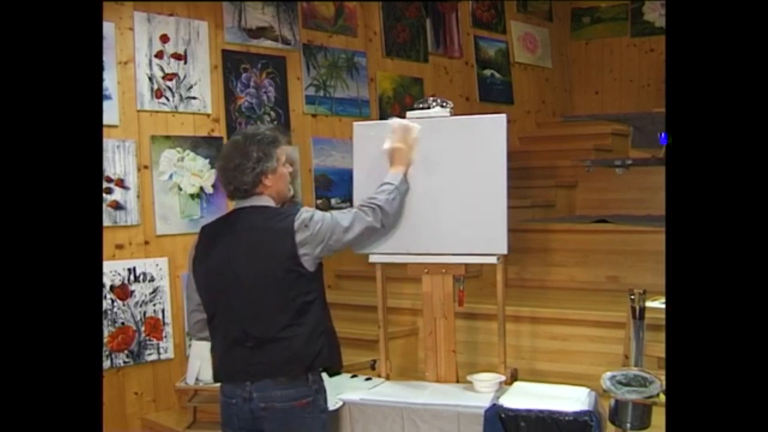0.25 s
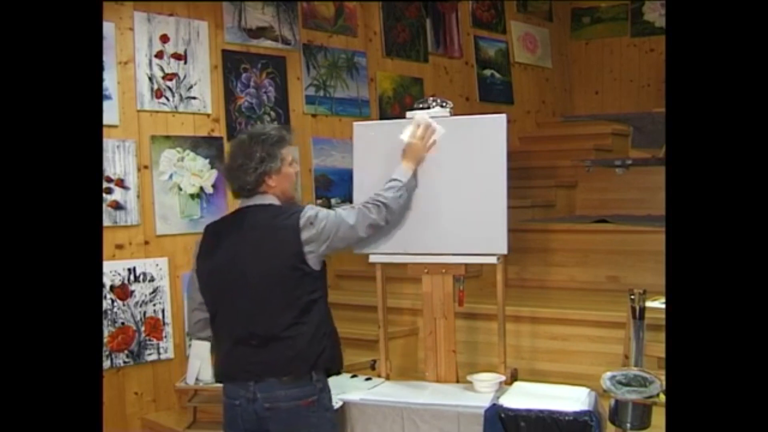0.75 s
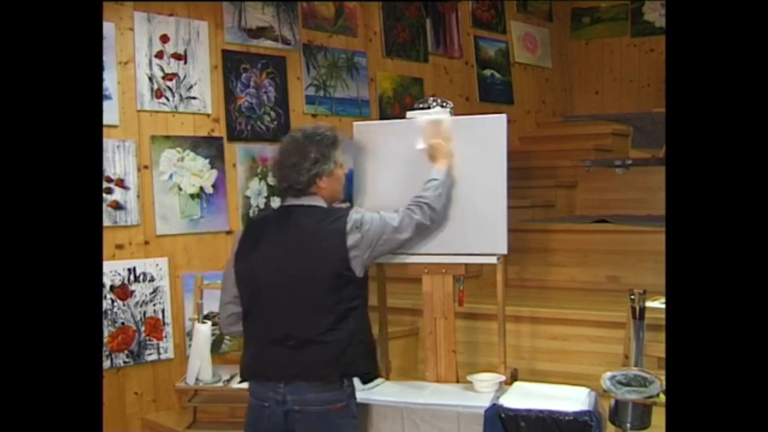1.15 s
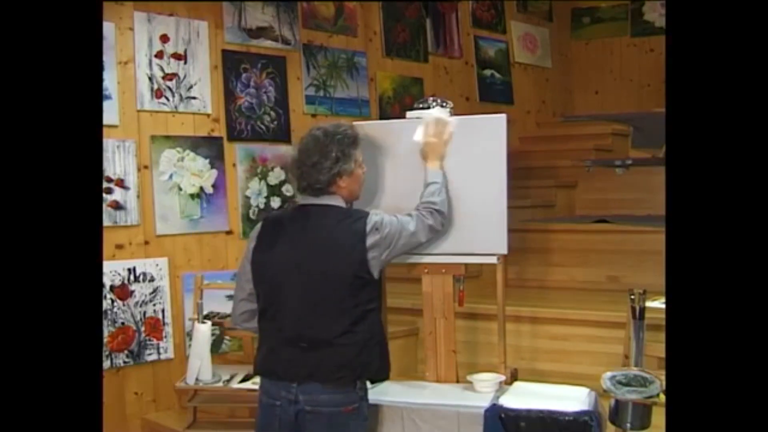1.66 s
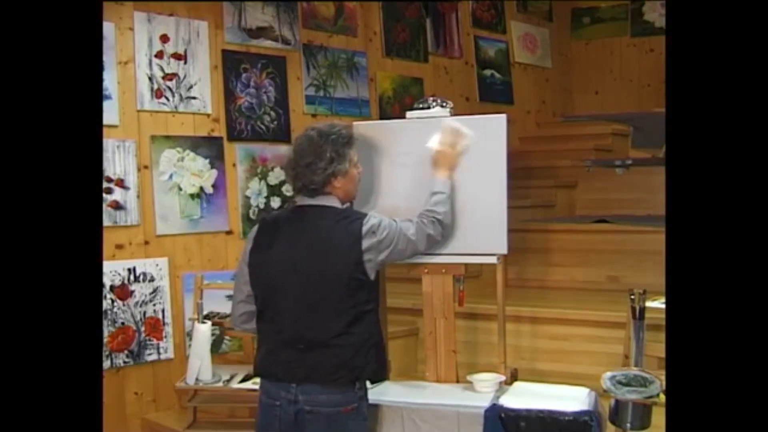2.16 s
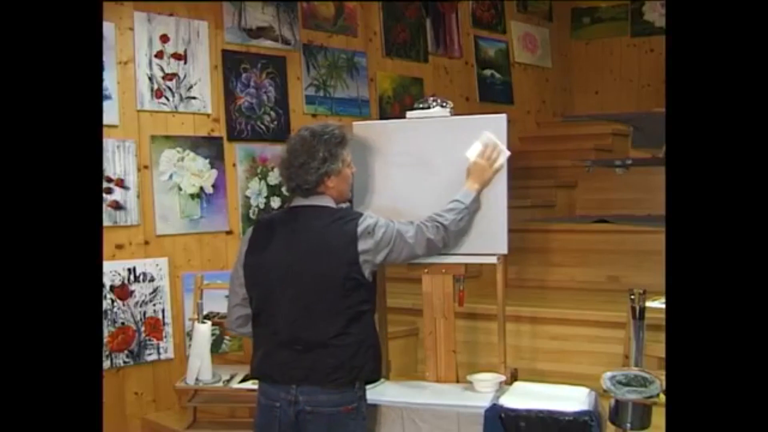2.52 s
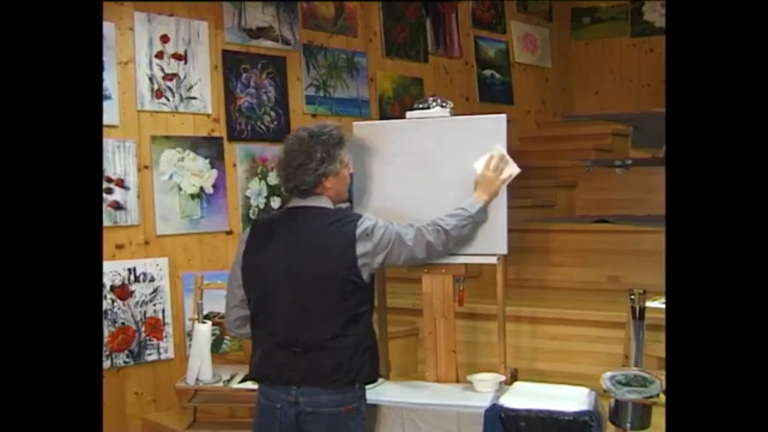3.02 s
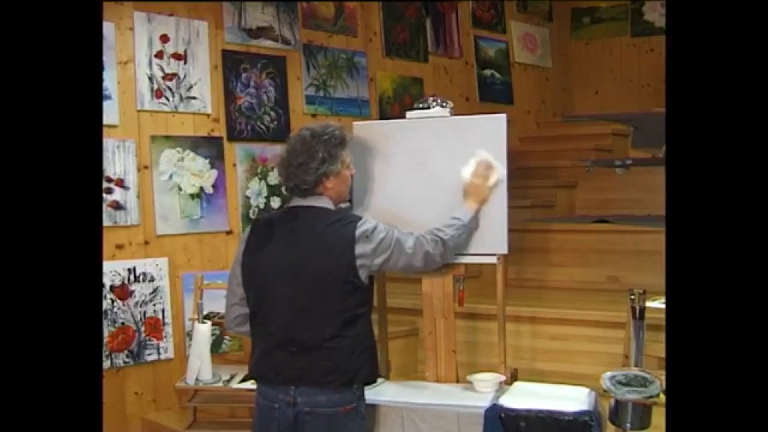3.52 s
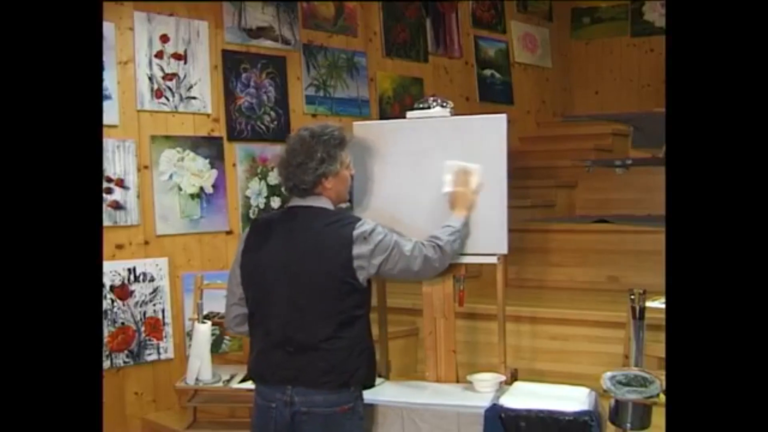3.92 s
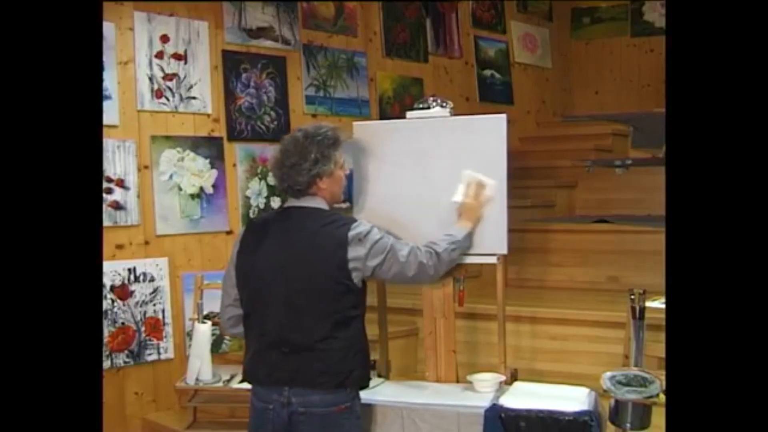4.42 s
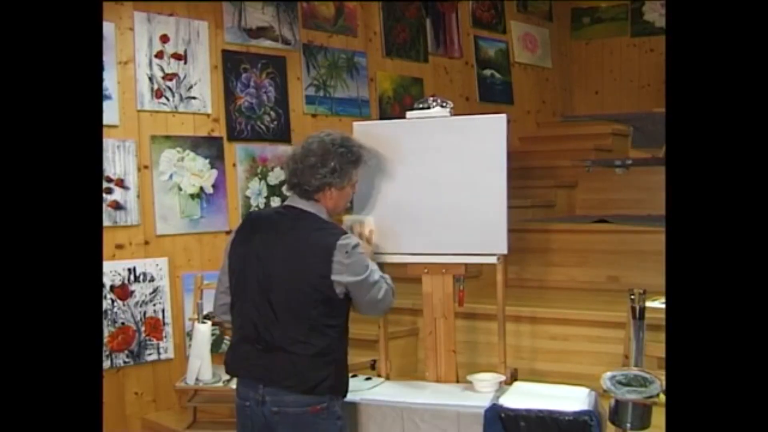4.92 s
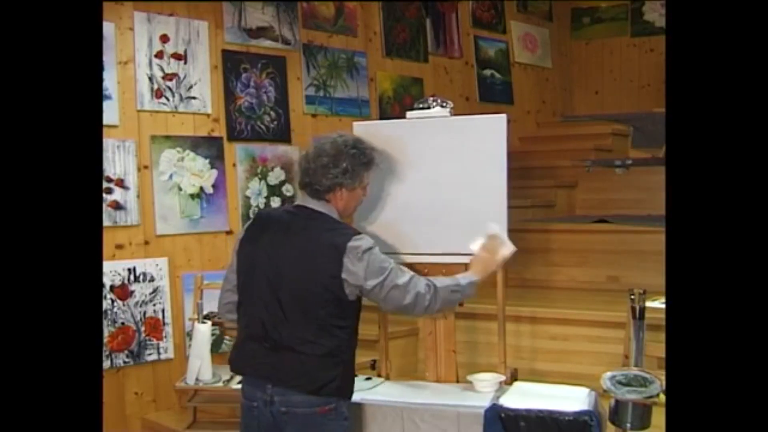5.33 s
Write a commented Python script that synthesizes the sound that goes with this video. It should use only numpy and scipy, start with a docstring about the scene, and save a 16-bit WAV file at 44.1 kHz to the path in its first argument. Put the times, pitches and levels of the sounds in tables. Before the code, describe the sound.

Rhythmic dry swishing of a paper pad wiping taut cloth, about four strokes a second, with faint motor hum underneath.

```python
"""In a quiet wooden studio, a pad of folded paper is wiped to and fro over a stretched canvas.
Paper fibres catch on the threads: a dense patter of random clicks, coloured by pad, cloth and weave.
Soft knocks ring the wooden stretcher as decaying sines, and a noise tail gives the room's reverberation.
Mains hum and a small motor (steady lines over a rumble) and room air (coloured noise) lie underneath.
Both channels carry the same signal."""
import sys
import numpy as np
from scipy import signal
from scipy.io import wavfile

SR = 44100
rng = np.random.default_rng(int(sys.argv[2]) if len(sys.argv) > 2 else 0)


def put_to_file(sound):
    """Save the sound as 16-bit audio at rate SR, in the file named by the first command-line argument."""
    columns = np.atleast_2d(sound).T  # one column per channel
    safe = np.clip(columns, -1, 1)
    whole_steps = np.round(safe * 32767)
    wavfile.write(sys.argv[1], SR, whole_steps.astype(np.int16))


N = 245785


def from_db(db):
    """Decibels to gain."""
    return 10 ** (np.asarray(db) / 20)


def rms_one(x):
    """Scale to unit rms."""
    return x / np.sqrt(np.mean(x ** 2) + 1e-20)


def drift(rate_hz):
    """Slow chance: noise at every 40th sample through a double one-pole low-pass; spread 1."""
    step = 40
    settle = 2000  # leading values dropped while the filter settles
    pole = np.exp(-2 * np.pi * rate_hz * step / SR)
    noise = rng.standard_normal(N // step + settle + 2)
    slow = signal.lfilter([1], [1, -2 * pole, pole * pole], noise)[settle:]
    return np.interp(np.arange(N) / step, np.arange(len(slow)), rms_one(slow))


def ring(x, hz, t60_s):
    """Resonance: a unit click sets off a decaying sine that starts at height 1."""
    radius = from_db(-60 / (t60_s * SR))
    angle = 2 * np.pi * hz / SR
    feedback = [1, -2 * radius * np.cos(angle), radius * radius]
    return signal.lfilter([0, np.sin(angle)], feedback, x + 1e-18)


def coloured(sources, spectrum, patchy_db, tilt_db=0):
    """Third-octave bands, each with its level, tilt about the middle band and own flicker; rms 1."""
    hz, level_db = np.transpose(spectrum)
    edges = hz[0] * 2 ** np.arange(0, np.log2(hz[-1] / hz[0]), 1 / 3)
    out = 0
    for k, (low, high) in enumerate(zip(edges, edges[1:])):
        band_pass = signal.butter(2, [low, high], "band", fs=SR, output="sos")
        band = signal.sosfilt(band_pass, sources[k % 2])  # neighbours take unrelated sources
        centre = np.sqrt(low * high)
        octaves = np.log2(centre / np.sqrt(hz[0] * hz[-1]))
        gain_db = np.interp(np.log(centre), np.log(hz), level_db) + tilt_db * octaves
        out = out + from_db(gain_db + patchy_db * drift(13.3)) * band
    return rms_one(out)


def strokes():
    """Speed swings from 0 at each turn to 1 mid-stroke; levels, colour and weave pitch follow it."""
    # one row a stroke: (turn before it [s], fastest moment [s], swish at the turn [dB],
    # swish at full speed [dB], peakedness of the swing [exponent], canvas share [dB],
    # fibre hiss share [dB], swish tilt [dB per octave], threads crossed at full speed [Hz],
    # weave share [dB], extra weave while gathering speed and less while slowing [dB]);
    # shares, tilt and thread rate are those at full speed
    stroke_table = [(-0.03, 0.075, -35.5, -36.0, 2.8, -15.5, -5.0, 4.5, 1930.0, -8.5, 2.0),
                    (0.181, 0.28, -43, -33.5, 0.76, -15.0, -7.5, 2.0, 1950, -13, 2.0),
                    (0.343, 0.47, -40.0, -36.0, 2.1, -15.0, -4.0, 1.5, 1920.0, -11.0, 2.0),
                    (0.591, 0.743, -42.5, -32.5, 0.83, -15.0, -12.0, 2.5, 1884.0, -7.5, 1.5),
                    (0.813, 0.923, -39, -36, 1.5, -14.0, -7.0, 3.5, 1880.0, -11, 2.0),
                    (1.027, 1.23, -43.0, -32.0, 0.71, -14, -6.0, 0.5, 2200.0, -12.0, 7.0),
                    (1.501, 1.649, -47.5, -30.5, 0.93, -14.0, -7.5, 1.0, 1953, -12, 2.25),
                    (1.791, 1.946, -41, -31, 1.52, -14.5, -4.5, 5, 1940, -10, 2.0),
                    (2.074, 2.228, -42, -29.0, 1.25, -16.0, -7.0, 0.5, 1940.0, -16, 2.0),
                    (2.362, 2.476, -42.0, -33, 0.99, -13.0, -5.0, 2.0, 1900, -13, 1.7),
                    (2.627, 2.776, -47.5, -39, 0.99, -14.5, -5.5, 2, 1620, -18.0, 2.0),
                    (2.884, 3.01, -48.0, -36.5, 1.15, -12.5, -5.0, 1.5, 1610.0, -28, 2.0),
                    (3.146, 3.288, -45, -34.0, 1.16, -14.0, -7, 1.5, 1800.0, -23, 2.0),
                    (3.428, 3.517, -42.5, -33.5, 1.2, -12.0, -7.0, 1, 1870.0, -14, 2.0),
                    (3.65, 3.74, -45.0, -32.5, 0.83, -13.5, -7, -2, 1970, -10.5, 1.7),
                    (3.866, 3.985, -41.5, -36.0, 0.83, -10.5, -5, 2.0, 1790, -16, 6.6),
                    (4.133, 4.254, -47.5, -34.6, 1.16, -13.5, -7.0, 2.5, 1740, -25.0, 2.0),
                    (4.375, 4.475, -43.5, -38, 2.5, -10.0, -4.5, 3.0, 1600.0, -25.0, 2.0),
                    (4.609, 4.753, -43.5, -36.5, 0.74, -13.5, -8.5, -1.0, 1800.0, -12.0, 4.0),
                    (4.895, 4.962, -46.0, -35.5, 1.6, -12.0, -9.5, 1.0, 1500.0, -23, 2.0),
                    (5.064, 5.325, -47.5, -31, 0.52, -15, -8.5, 2.0, 2780, -16, 8.9),
                    (5.532, 5.624, -47, -38, 0.29, -19.5, -18, 3, 2120.0, -23, 2.0)]
    last_stroke_s = 0.3
    turn_canvas_db, turn_fibre_db, turn_weave_db = 3.5, -2.5, -10.5  # change of the shares at a turn
    turn_tilt_db = 1.0  # per octave, at a turn
    turn_weave_share = 0.62  # weave pitch at a turn as a share of full speed
    landing_s, lift_s, lift_db = 4.957, 0.046, -7  # the pad eases off just before it lands again

    (turn_s, fast_s, turn_db, fast_db, peaked, canvas_db, fibre_db,
     tilt_db, weave_hz, weave_db, push_db) = np.transpose(stroke_table)
    last = len(turn_s) - 1
    t = np.arange(N) / SR

    # swing is whole at each turn and half-way between at the fastest moment
    knots = np.append(np.ravel([turn_s, fast_s], "F"), turn_s[-1] + last_stroke_s)
    swing = np.interp(t, knots, np.arange(len(knots)) / 2)
    stroke = np.minimum(swing.astype(int), last)
    speed = np.abs(np.sin(np.pi * swing))
    slow = 1 - speed ** peaked[stroke]

    nearest_turn_db = turn_db[np.minimum(np.round(swing).astype(int), last)]
    swish_db = fast_db[stroke] + (nearest_turn_db - fast_db[stroke]) * slow
    swish_db += lift_db * np.clip(1 - (landing_s - t) / lift_s, 0, 1) * (t < landing_s)

    canvas_now_db = np.interp(t, fast_s, canvas_db) + turn_canvas_db * slow
    fibre_now_db = np.interp(t, fast_s, fibre_db) + turn_fibre_db * slow
    tilt_now_db = (1 - slow) * tilt_db[stroke] + slow * turn_tilt_db
    weave_now_hz = weave_hz[stroke] * (speed + turn_weave_share * (1 - speed))
    push_now_db = push_db[stroke] * np.sin(2 * np.pi * swing)
    weave_now_db = weave_db[stroke] + turn_weave_db * slow + push_now_db
    return swish_db, canvas_now_db, fibre_now_db, tilt_now_db, weave_now_hz, weave_now_db


def catches():
    """Two unrelated patters of fibres snagging on threads: random moments, sizes and signs."""
    catches_per_s, spread_db = 9000, 0.5
    sizes = from_db(spread_db * np.minimum(rng.exponential(1, (2, N)), 5))
    signs = rng.choice([-1, 1], (2, N))
    return sizes * signs * (rng.random((2, N)) < catches_per_s / SR)


def weave(patter, hz):
    """Crossing threads at speed gives a blurred pitch; the over-under pattern adds its half."""
    blur = 0.25  # bandwidth of one filter stage as a share of its pitch
    block = 128  # samples between changes of pitch
    out = np.zeros(N)
    for part, part_db in [(0.934, 6.5), (0.467, -7.5)]:  # (share of the thread rate, dB)
        state = np.zeros((2, 2))
        for i in range(0, N, block):
            crossing = part * hz[i]
            r = np.exp(-np.pi * blur * crossing / SR)
            middle = -2 * r * np.cos(2 * np.pi * crossing / SR)
            stage = [(1 - r * r) / 2, 0, (r * r - 1) / 2, 1, middle, r * r]
            tone, state = signal.sosfilt([stage, stage], patter[i:i + block], zi=state)
            out[i:i + block] += from_db(part_db) * tone
    return rms_one(out)


def wiping():
    """One pair of patters drives cloth, pad, weave and fibres; the grip wavers for all at once."""
    # cloth drumming, pad rubbing and fibre hiss: (frequency [Hz], relative level [dB per Hz])
    canvas_spectrum = [(150, -42), (300, -8.5), (450, -14), (560, -1.5), (800, -3.5), (1100, 2.5),
                       (1500, -6), (2400, -13)]
    swish_spectrum = [(700, -21), (1200, -10.5), (1700, -4), (2400, -4), (3400, -3), (4800, -5),
                      (6500, -14), (10000, -18)]
    fibre_spectrum = [(4000, -23.5), (6000, 0.5), (7500, -5), (9500, -4), (11000, -9), (12500, -19),
                      (14000, -17.5), (15500, -20), (19500, -26)]
    # ringing modes of the cloth: (frequency [Hz], share before its flicker [dB], t60 [s])
    cloth_modes = [(547.7, -14.5, 0.1), (669, -17, 0.13)]

    swish_db, canvas_db, fibre_db, tilt_db, weave_hz, weave_db = strokes()
    patter = catches()
    modes = 0
    for hz, share_db, t60_s in cloth_modes:
        flicker_db = 3.9 * drift(14)
        modes = modes + from_db(share_db + flicker_db) * rms_one(ring(patter[0], hz, t60_s))
    canvas = from_db(canvas_db) * (coloured(patter, canvas_spectrum, patchy_db=2.5) + modes)
    swish = coloured(patter, swish_spectrum, patchy_db=0.93, tilt_db=tilt_db)
    fibres = from_db(fibre_db) * coloured(patter, fibre_spectrum, patchy_db=1.5)
    threads = from_db(weave_db) * weave(patter[1], weave_hz)
    grip_db = 0.58 * drift(39)
    return from_db(swish_db + grip_db) * (canvas + swish + threads + fibres)


def hum():
    """Steady lines on multiples of the motor's turning rate, over a narrow rumble of its casing."""
    # order (multiple of the turning rate): level [dB rms]; 4 and 12 fall on the mains
    hum_lines = {4: -55.5, 9: -69, 11: -56, 12: -62.5}
    # motor casing rumble: (centre [Hz], width [Hz], level [dB rms])
    casing = (134, 20, -65)
    motor_hz = 12.5
    throb_s = 0.06  # a moment at which the hum lines add up

    turn = 2 * np.pi * motor_hz * (np.arange(N) / SR - throb_s)
    lines = 0
    for order, level_db in hum_lines.items():
        lines = lines + np.sqrt(2) * from_db(level_db) * np.cos(order * turn)
    hz, width_hz, rumble_db = casing
    rumble = ring(rng.standard_normal(N), hz, np.log(1000) / (np.pi * width_hz))
    return lines + from_db(rumble_db) * rms_one(rumble)


def room_air():
    """Room air: noise in bands that each flicker a little."""
    # (frequency [Hz], relative level [dB per Hz])
    air_spectrum = [(20, -6), (45, -1), (110, 4), (180, -3), (400, -6.5), (900, -5), (2500, -18.5),
                    (7000, -39), (15000, -47), (19500, -34)]
    air_db = -57.5  # rms
    return from_db(air_db) * coloured(rng.standard_normal((2, N)), air_spectrum, patchy_db=1.3)


def bumps():
    """Soft knocks set the wooden stretcher ringing, each mode with its own strength."""
    # the hand knocks the stretcher bar: (time [s], level before trim and chance [dB])
    knocks = [(0.253, -41), (0.288, -48), (0.325, -43)]
    # modes of the bar: (frequency [Hz], relative level [dB], t60 [s])
    bar_modes = [(203, -1, 0.12), (256, -4, 0.11), (321.5, -1, 0.13), (370, 2, 0.063)]
    trim_db = -6.5

    at = [round(time_s * SR) for time_s, _ in knocks]
    knock_db = np.array(knocks)[:, 1]
    chance_db = rng.normal(0, 2.0, (len(knocks), len(bar_modes)))
    out = np.zeros(N)
    for (hz, level_db, t60_s), mode_chance_db in zip(bar_modes, chance_db.T):
        clicks = np.zeros(N)
        clicks[at] = from_db(knock_db + level_db + trim_db + mode_chance_db)
        out += ring(clicks, hz, t60_s)
    return out


def studio(x):
    """Diffuse reverberation: a dull noise tail that dies away."""
    t60_s, wall_cut_hz, gap_s, level_db = 0.23, 1900, 0.008, -19
    t = np.arange(SR // 2) / SR
    dull = np.exp(-2 * np.pi * wall_cut_hz / SR)
    noise = signal.lfilter([1], [1, -dull], rng.standard_normal(len(t)))
    tail = noise * from_db(-60 * t / t60_s) * (t > gap_s)
    tail = tail / np.sqrt(np.sum(tail ** 2))
    return from_db(level_db) * signal.fftconvolve(x, tail)[:N]


def scene():
    """Easel sounds with their reverberation, plus hum and room air, alike in both channels."""
    easel = wiping() + bumps()
    mix = easel + studio(easel) + hum() + room_air()
    return np.tile(mix, (2, 1))


def record(dry):
    """A steep elliptic low-pass cuts the top."""
    cutoff_hz, ripple_db, stop_db = 15020, 0.5, 70
    low_pass = signal.ellip(14, ripple_db, stop_db, cutoff_hz, fs=SR, output="sos")
    return signal.sosfilt(low_pass, dry)


dry = scene()
out = record(dry)
put_to_file(out)
```